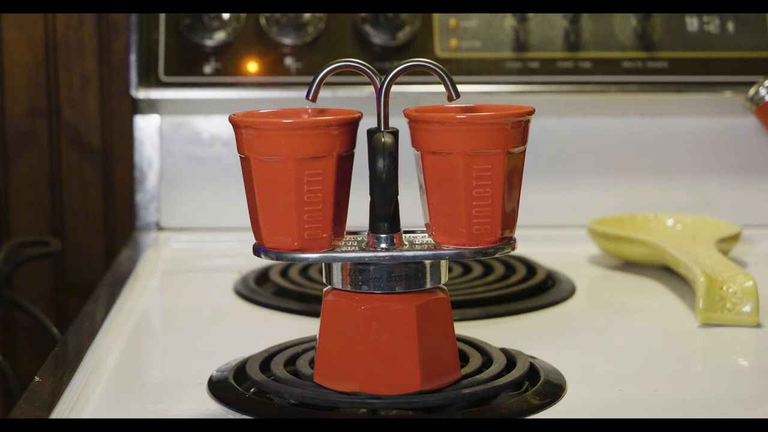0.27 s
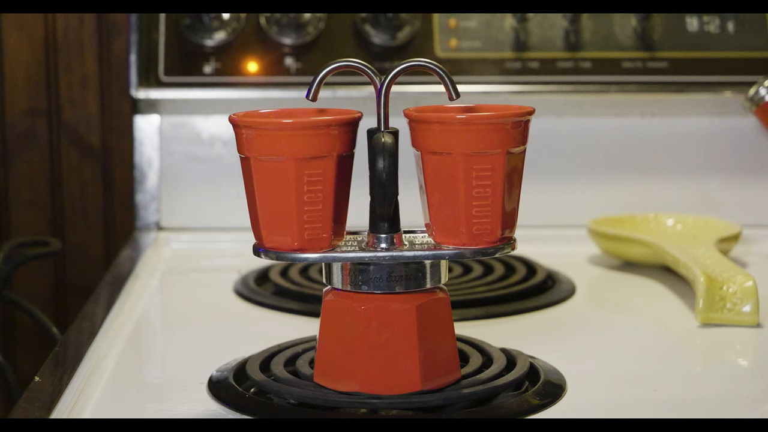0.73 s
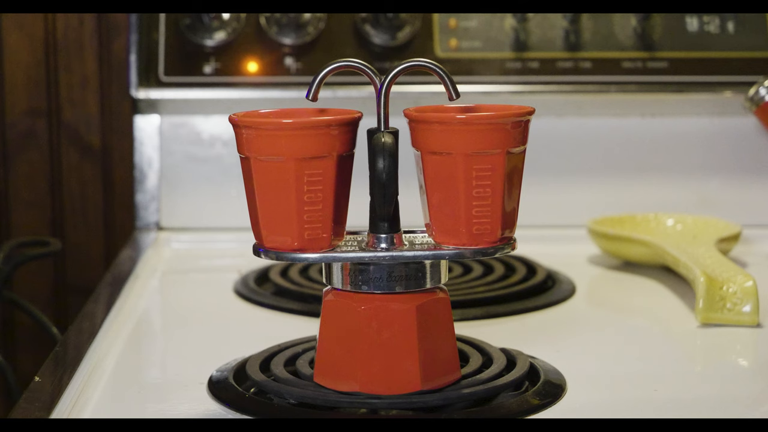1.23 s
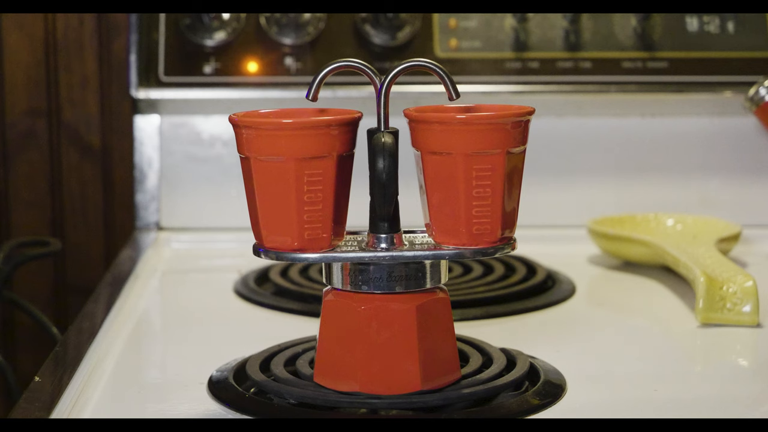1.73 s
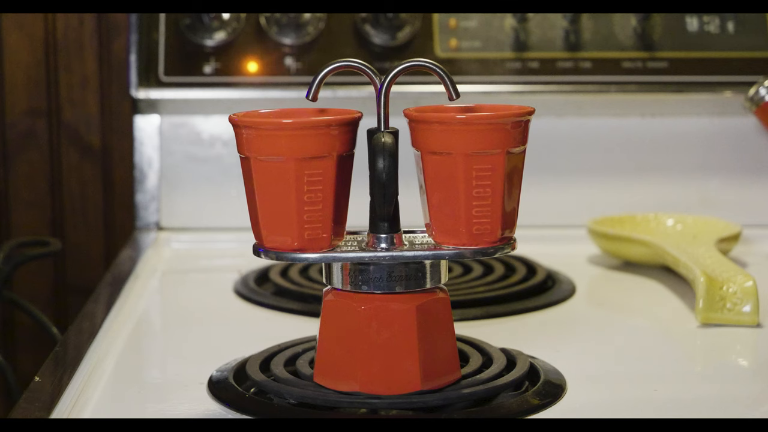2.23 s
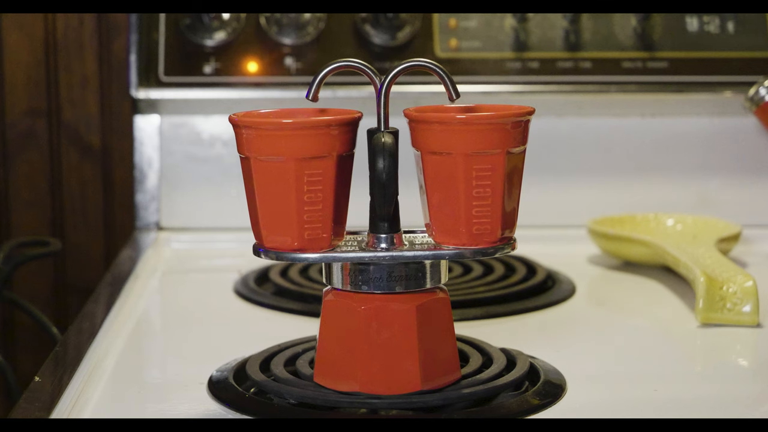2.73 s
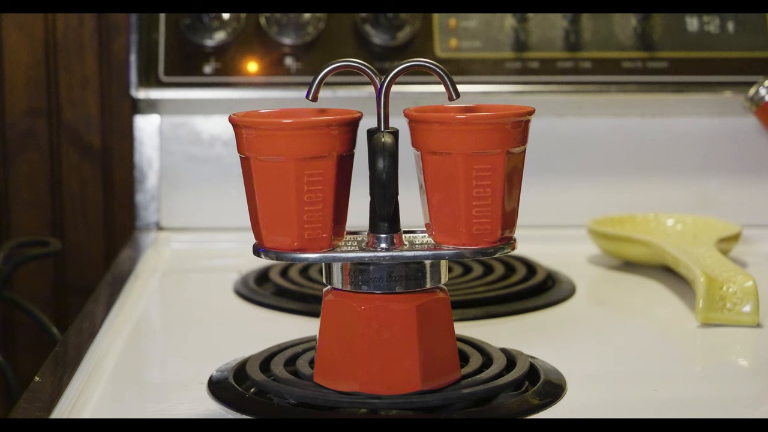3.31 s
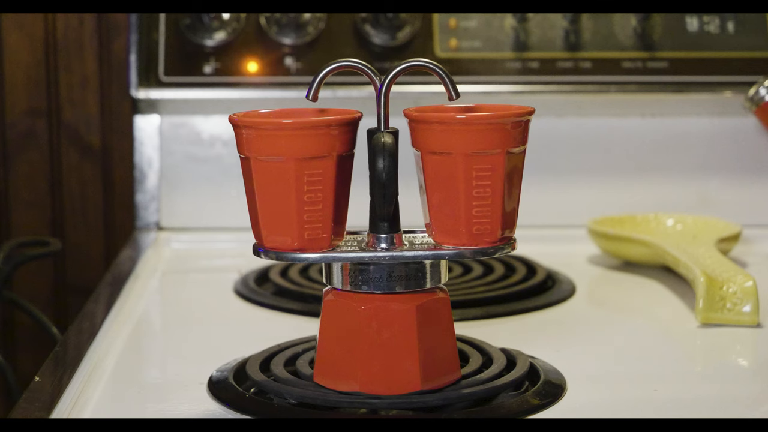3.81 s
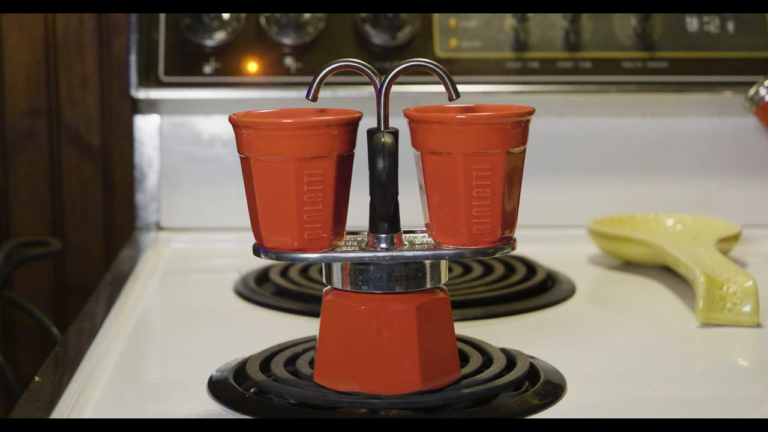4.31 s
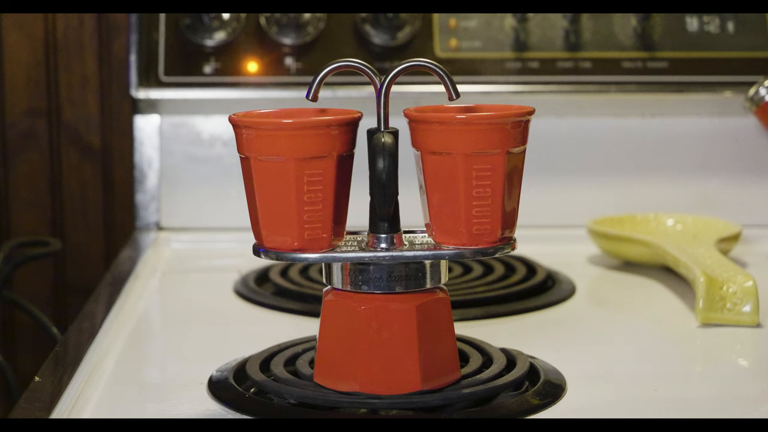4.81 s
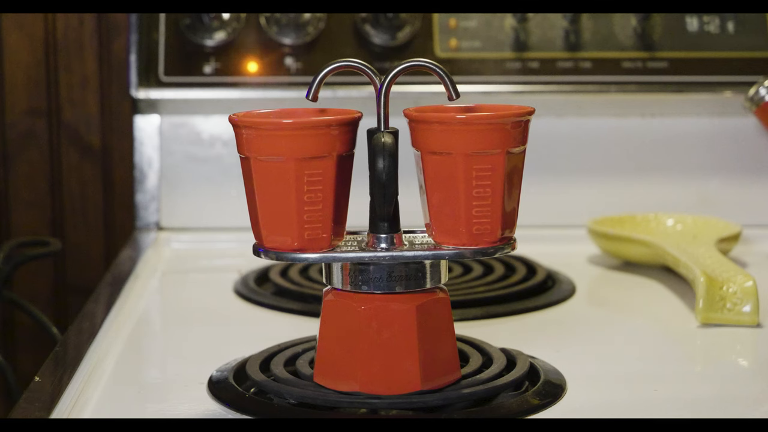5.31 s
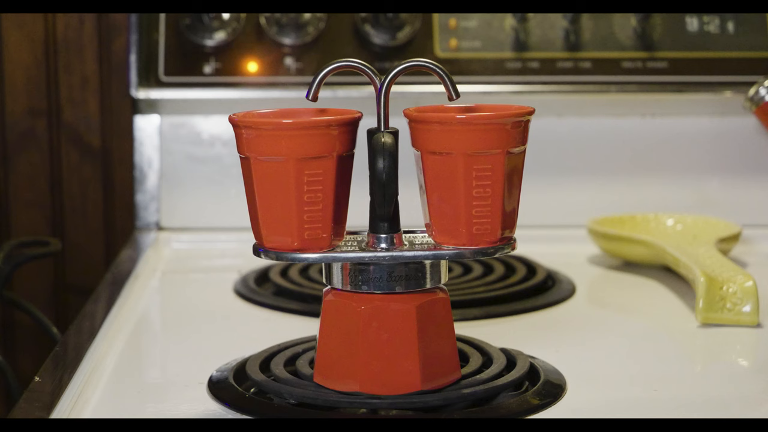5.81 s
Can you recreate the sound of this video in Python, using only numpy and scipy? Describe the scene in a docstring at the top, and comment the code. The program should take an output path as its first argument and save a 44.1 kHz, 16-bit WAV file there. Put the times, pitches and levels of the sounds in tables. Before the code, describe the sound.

Steam bubbles snap and tick inside a little coffee pot on an electric stove, surging twice, with soft boiler thuds and faint room hum.

```python
"""Steam bubbles burst in the narrow riser of a small coffee pot on an electric stove: each gives a few
cycles of ringing and a sharp tick. Loud bursts come singly and in dense surges over a crackle of small ones.
Single-cycle thuds gurgle low in the boiler and one jet of steam hisses from a spout.
The place is a quiet kitchen with filtered noise and a faint hum; the pot stands close to the microphone,
and short noise tails give the scatter from the surfaces nearby."""
import sys
import numpy as np
from scipy import signal
from scipy.fft import rfft, irfft
from scipy.io import wavfile
from scipy.ndimage import uniform_filter1d

SR = 44100
rng = np.random.default_rng(int(sys.argv[2]) if len(sys.argv) > 2 else 0)


def put_to_file(sound):
    """Save the sound as 16-bit audio at rate SR, in the file named by the first command-line argument."""
    columns = np.atleast_2d(sound).T  # one column per channel
    safe = np.clip(columns, -1, 1)
    whole_steps = np.round(safe * 32767)
    wavfile.write(sys.argv[1], SR, whole_steps.astype(np.int16))


N = 267246  # length in samples


def gain_of(db):
    """Amplitude factor of a level in dB."""
    return 10 ** (np.asarray(db) / 20)


def evened(x):
    """Scale to an RMS of 1."""
    return x / np.sqrt(np.mean(x ** 2) + 1e-20)


def read(points, hz):
    """Read a spectrum between its points, along a logarithmic frequency axis."""
    f, value = np.transpose(points)
    return np.interp(np.log(hz + 1), np.log(f + 1), value)


def add(mix, s, sound):
    """Lay a sound into the mix from time s, cut off at the end."""
    start = max(int(s * SR), 0)
    part = mix[start:start + len(sound)]
    part += sound[:len(part)]


def slow_wander(noise, size):
    """Noise smoothed twice over size samples, RMS 1."""
    return evened(uniform_filter1d(uniform_filter1d(noise, size), size))


def causal(points):
    """Impulse response of a spectrum with all its energy after the start; envelope peak 1."""
    hz = abs(np.fft.fftfreq(4096, 1 / SR))
    log_gain = np.log(gain_of(np.maximum(read(points, hz), -100)))
    minimum_phase = -signal.hilbert(log_gain).imag
    taps = np.fft.ifft(np.exp(log_gain + 1j * minimum_phase)).real[:1024]
    return taps / abs(signal.hilbert(taps)).max()


def bubble(hz, cycles, phase, overtone, size=300):
    """A bubble swings up over some cycles to a peak near 1 and dies away in the froth."""
    u = np.arange(size) / SR * hz
    turn = 2 * np.pi * (u + phase)
    shape = ((u / cycles) * np.exp(1 - u / cycles)) ** 2
    sharper = overtone * shape ** 2 * np.cos(2 * turn)  # compression is sharper than release
    return shape * np.cos(turn) + sharper


def tear(db, luck):
    """A film tears in a few uneven snaps, so that every tick has its own colour."""
    u = np.arange(len(luck)) / 7.02
    return gain_of(db) * luck * u * np.exp(1 - u) / 2


# Colour of the ticks and hiss as the microphone hears them: a dip near 4 kHz, a peak near 5 kHz.
# Each row: frequency in Hz, relative level in dB per Hz.
TICK_COLOUR = [(1500, -15.5), (2500, -5), (3890, -13), (4890, -3.5), (6650, -10), (10800, -22),
               (13000, -19), (16000, -39.5)]


def coloured(x):
    """Filter ticks or hiss to the colour in which the microphone hears them."""
    return signal.oaconvolve(x, causal(TICK_COLOUR))[:len(x)]


# The simmer between gushes, close by in the pot.
# Each row: time in seconds, steam pressure as a level in dB.
SIMMER = [(0, -33), (.35, -46), (.52, -34), (.62, -52), (.78, -36.5), (.85, -62.5), (1.2, -52), (1.45, -41),
          (1.8, -38), (2.0, -45.5), (2.12, -56), (2.39, -53.5), (2.55, -46), (3.15, -56), (3.7, -48),
          (3.95, -39), (4.12, -43), (4.3, -38), (4.7, -46.5), (5.15, -39), (5.34, -50.5), (5.42, -49),
          (6.06, -51.5)]


def simmer_db(t):
    """Steam pressure of the simmer, in dB, in straight lines between the points."""
    return np.interp(t, *np.transpose(SIMMER))


# Gushes, in which small bubbles crowd together.
# Each row: start in seconds, length in seconds, level in dB.
GUSHES = [(.003, 0.02, -25.5), (0.098, 0.022, -30.5), (0.227, 0.019, -37), (0.459, 0.012, -26.5),
          (1.403, 0.026, -25.5), (1.437, 0.017, -28), (1.52, 0.015, -27.5), (1.559, 0.033, -30),
          (1.61, 0.019, -26.5), (1.638, 0.048, -26), (1.711, 0.04, -20), (1.771, 0.077, -22.5),
          (1.846, 0.018, -27), (3.952, .018, -33), (3.98, .022, -33), (4.07, 0.017, -32.5),
          (4.148, 0.018, -26), (4.207, 0.022, -29.5), (4.235, 0.048, -21), (4.303, 0.025, -24.5),
          (4.345, 0.022, -38), (4.387, 0.058, -22), (4.456, 0.055, -26), (4.611, 0.043, -32.5),
          (5.027, 0.027, -34), (5.075, 0.0088, -25), (5.154, 0.0058, -24), (5.211, 0.034, -33)]
GUSH_EDGE_S = 0.0022  # rise before the start and fall after the end


def steam(t):
    """Level of the small bubbles in dB: the powers of the simmer and of each gush add up."""
    power = gain_of(simmer_db(t)) ** 2
    for s, length, db in GUSHES:
        inside_s = np.minimum(t - s, s + length - t)
        swell = np.clip(inside_s / GUSH_EDGE_S + 1, 0, 1)
        power = power + (gain_of(db) * swell) ** 2
    return 10 * np.log10(power)


# Colour of the kitchen air at the microphone.
# Each row: frequency in Hz, relative level in dB per Hz.
AIR_COLOUR = [(45, -14), (107, 23.5), (271, 14), (690, -10), (2040, -5.5), (3920, -6), (5050, 0),
              (15300, -12), (16500, -31)]
AIR_DB, WAVER_DB = -57.5, 3  # RMS of the noise; RMS of the waver of its treble
HUM_HZ, HUM_DB = 59.5, -72  # RMS level


def air():
    """Kitchen noise with a faint mains hum; its treble hiss wavers and swells with the steam."""
    t = np.arange(N) / SR
    hz = np.fft.rfftfreq(N, 1 / SR)
    white, slow = rng.standard_normal((2, N))
    colour = rfft(white) * gain_of(read(AIR_COLOUR, hz))
    treble = hz / (hz + 2000)  # share of the hiss, half at 2000 Hz
    waver_db = WAVER_DB * slow_wander(slow, 2000)
    swell_db = 0.19 * (simmer_db(t) + 57)
    body = irfft(colour * (1 - treble), N)
    hiss = gain_of(waver_db + swell_db) * irfft(colour * treble, N)
    hum = np.sqrt(2) * np.sin(2 * np.pi * HUM_HZ * t)
    return gain_of(AIR_DB) * evened(body + hiss) + gain_of(HUM_DB) * hum


def nearby(x, t60, db, delay):
    """Scatter from cups, stove top and walls: a noise tail that fades in over a delay (s), then decays."""
    t = np.arange(SR // 4) / SR
    fade_in = np.clip(t / delay, 0, 1) ** 2
    tail = rng.standard_normal(len(t)) * gain_of(-60 * t / t60) * fade_in
    return gain_of(db) * signal.oaconvolve(x, tail / np.linalg.norm(tail))[:N]


# The loudest thuds, low in the boiler.
# Each row: start in seconds, peak in dB, pitch in Hz.
GLUGS = [(0.185, -37, 302), (0.374, -39, 437), (0.554, -34, 519), (0.959, -36.5, 301), (1.261, -44.5, 233),
         (2.302, -32, 568), (2.362, -27, 620), (2.969, -35.5, 533), (3.025, -35.5, 412),
         (3.103, -38.5, 260), (3.323, -35.5, 430), (3.666, -32.5, 430), (3.902, -37, 242), (4.04, -33, 299),
         (4.15, -37, 296), (4.47, -26, 520), (4.623, -22, 398), (4.854, -32, 520), (5.214, -29.5, 519),
         (5.28, -33, 493), (5.991, -39, 557)]
GLUG_CYCLES = 1.07  # cycles up to the peak
GURGLE_DB, GURGLES_PER_S = -51.5, 100  # RMS of the small thuds; their mean rate
GURGLE_STEP = 100  # samples between chances of a small thud


def gurgle():
    """Large bubbles collapse in the boiler with single-cycle thuds; the small ones are harder in a surge."""
    draw = rng.random((N // GURGLE_STEP, 5))
    t = np.arange(len(draw)) * GURGLE_STEP / SR
    out = np.zeros(N)
    for now, steam_db, (chance, size, pitch, length, phase) in zip(t, steam(t), draw):
        if chance < GURGLES_PER_S * GURGLE_STEP / SR:
            db = 0.1 * steam_db - 1.97 * np.log(size + 0.0056)  # a few are much louder
            thud = bubble(240 * 2.3 ** pitch, .22 + .35 * length, phase, 0, size=1400)
            add(out, now, gain_of(db) * thud)
    out = gain_of(GURGLE_DB) * evened(out)
    for (s, db, hz), phase in zip(GLUGS, rng.random(len(GLUGS))):
        add(out, s, gain_of(db) * bubble(hz, GLUG_CYCLES, phase, 0.46, size=1400))
    return out


# One jet of steam from a spout.
# The single row: level in dB, resonance in Hz, decay by 60 dB in seconds.
SPIT = (-31, 2970, 0.13)
SPIT_S = 2.761  # start


def spit():
    """A fluttering hiss, part of it ringing in the spout."""
    db, hz, t60 = SPIT
    t = np.arange(SR // 8) / SR
    jet, flutter = rng.standard_normal((2, len(t)))
    ring = signal.lfilter(*signal.iirpeak(hz, 4.5, SR), jet)
    hiss = coloured(jet)
    flutter_db = 1.8 * evened(uniform_filter1d(flutter, 90))
    swell = np.clip(t / 0.0045, 0, 1) * gain_of(-60 * t / t60 + flutter_db)
    out = np.zeros(N)
    add(out, SPIT_S, gain_of(db) * swell * (evened(ring) + 0.48 * evened(hiss)))
    return out


RISER_HZ, CROWDED_DB = 2220, -34.5  # around this steam level the froth comes to ring at the riser's pitch


def crackle():
    """Small bubbles at random; more steam makes them denser and louder, and each loud burst sheds froth."""
    t = np.arange(N) / SR
    s, pop_db, pop_hz, _ = np.transpose(POPS)
    shed = np.zeros(N)
    shed[(s * SR).astype(int)] = gain_of(pop_db - 13.0) ** 2
    shed = signal.lfilter([1], [1, -np.exp(-1 / (0.0043 * SR))], shed)  # power of the froth dies away

    steam_db = steam(t)
    crowded = np.clip((steam_db - CROWDED_DB) / 8 + .5, 0, 1)
    clump_db = (5.5 - 2.3 * crowded) * slow_wander(rng.standard_normal(N), 300)
    level_db = 10 * np.log10(gain_of(steam_db + clump_db) ** 2 + shed)
    denser_db = .25 * (level_db + 47.0)  # a quarter of the level goes into the rate, the rest into the size

    chance, size, pitch, length, phase, sharpness, merging = rng.random((7, N))
    at = np.flatnonzero(chance < 330 * gain_of(2 * denser_db) / SR)  # 330 bubbles per s at -47 dB
    size_db = level_db - denser_db - 4.2 * np.log(size + 0.016)
    tick_db = size_db - 10 + 24 * (sharpness - .5)

    hz = np.interp(t, s, pop_hz) ** (1 - crowded) * RISER_HZ ** crowded
    hz = hz * np.exp((0.63 - 0.31 * crowded) * (pitch - .45))
    merged = merging < .3
    hz = np.where(merged, 960 * 1.55 ** pitch, hz)  # merged bubbles are larger and sound lower and softer
    ring_db = size_db - 1.86 * merged
    cycles = .55 + .5 * crowded * ~merged + .7 * length

    rings, ticks = np.zeros(N), np.zeros(N)
    snaps = rng.standard_normal((4096, 90))
    for i in at:
        add(ticks, i / SR, tear(tick_db[i], snaps[i % 4096]))
        ring = bubble(hz[i], cycles[i], phase[i], 0.27, size=500)
        add(rings, i / SR, gain_of(ring_db[i]) * ring)
    return rings + coloured(ticks)


# The loudest bursts in the riser, close to the microphone.
# Each row: time in seconds, level of the ring in dB, bubble pitch in Hz, level of the tick in dB.
POPS = [(0.0059, -20, 2310, -8), (0.016, -15, 2520, -2.5), (0.054, -16, 2360, -13),
        (0.0712, -15, 2300, -11), (0.0825, -18.5, 2300, -18), (0.0994, -13, 2380, -15),
        (0.2012, -13, 2360, -12), (0.2297, -19, 2070, -10), (0.2471, -12, 2350, -11),
        (0.2558, -12, 1920, -19), (0.3077, -17, 2070, -24), (0.3387, -24.5, 2420, -24),
        (0.3596, -21.5, 2420, -21), (0.3783, -22.5, 1910, -13), (0.431, -14, 1960, -12),
        (0.4599, -14.5, 1940, -20), (0.5087, -16, 2000, -7.5), (0.5212, -21, 2000, -14.5),
        (0.5585, -20, 1870, -21), (0.596, -26, 1800, -19.5), (0.6219, -23, 1900, -21),
        (0.6312, -19.5, 2400, -18), (0.7456, -16.5, 1940, -12.5), (0.7656, -14.5, 1870, -10),
        (0.817, -25.5, 1870, -22.5), (0.8771, -33, 1880, -27), (0.8995, -32.5, 1960, -20),
        (1.0383, -32.5, 1850, -32), (1.1012, -22, 1920, -15.5), (1.1703, -19, 2400, -27),
        (1.1785, -16, 1950, -6), (1.197, -21, 1940, -6.5), (1.3188, -17, 1940, -9.5),
        (1.3469, -32, 2040, -18), (1.3825, -21, 1860, -12.5), (1.4142, -33, 1970, -8),
        (1.4261, -31, 2070, -19), (1.446, -18, 2120, -21), (1.4566, -31, 2080, -16),
        (1.497, -18.5, 2290, -11), (1.513, -14.5, 2460, -8), (1.5293, -16, 2070, -6),
        (1.549, -12, 1910, -7), (1.5598, -23, 1500, -16), (1.5844, -15, 2000, -14),
        (1.6187, -14.5, 1340, -6.5), (1.6531, -13.5, 2400, -4), (1.6727, -14, 1470, -9),
        (1.7179, -9, 2330, -16), (1.7278, -13, 1940, -17), (1.743, -11, 2000, -10),
        (1.7581, -10, 2320, -33), (1.7788, -12.5, 2190, -25), (1.8074, -9, 1980, -14),
        (1.838, -22, 2200, -28), (1.8676, -14, 2190, -24), (1.9577, -21, 2240, -34),
        (1.9893, -17, 2030, -11.5), (2.0122, -15.5, 2120, -10), (2.0514, -21.5, 2260, -18),
        (2.0738, -19, 2250, -26), (2.195, -17.5, 990, -26), (2.2325, -16.5, 1040, -45),
        (2.3761, -16, 1100, -40), (2.3946, -18, 1040, -33), (2.413, -18, 2240, -12.5),
        (2.427, -24.5, 2340, -35), (2.482, -23, 1970, -15.5), (2.5065, -26, 2400, -16.5),
        (2.5513, -42, 1820, -24), (2.566, -26, 1820, -14), (2.6267, -19, 1860, -21),
        (2.6958, -18.5, 2060, -25), (2.7557, -25, 2360, -21.5), (2.825, -29.5, 1410, -17),
        (3.0291, -23, 1830, -23.5), (3.0551, -22, 1900, -14.5), (3.229, -32, 2570, -12),
        (3.241, -12.5, 2570, -5.5), (3.3616, -21, 1940, -13), (3.3777, -22, 2020, -14),
        (3.4513, -20, 2380, -12.5), (3.515, -30, 2480, -23), (3.5324, -23.5, 2490, -40),
        (3.5503, -12, 2320, -6.5), (3.596, -19.5, 2570, -29), (3.7719, -13.5, 2220, -8),
        (3.793, -21, 2430, -38), (3.8521, -34, 1210, -13), (3.8738, -35, 1280, -8),
        (3.8955, -39, 1850, -18.5), (3.9359, -30, 1940, -19), (3.9485, -18, 1670, -6.5),
        (3.9754, -20, 2340, -17), (3.9895, -18, 2020, -13.5), (4.0293, -20, 2520, -21),
        (4.0805, -13, 2160, -1), (4.0912, -15, 1980, -6.5), (4.1477, -17.5, 2250, -10),
        (4.1585, -10.5, 2250, -15), (4.19, -19, 2320, -14), (4.1995, -4.5, 2290, -8),
        (4.2461, -11.5, 1980, -13), (4.259, -5, 2160, -20), (4.2714, -9.5, 2450, -26),
        (4.2886, -10.5, 2270, -24), (4.3046, -10.5, 2460, -7.5), (4.331, -10.5, 2250, -26),
        (4.3535, -11, 2310, -15), (4.4051, -19, 2060, -4.5), (4.4176, -8, 2380, -26),
        (4.4305, -6.5, 2190, -25), (4.459, -19, 2030, -14), (4.4982, -17.5, 2450, -6),
        (4.5632, -36, 2020, -28), (4.5746, -21, 1990, -18), (4.5919, -15, 2070, -23),
        (4.6075, -22, 2070, -22), (4.6162, -20.5, 2080, -21), (4.6271, -26, 955, -28),
        (4.657, -25, 1870, -19), (4.7187, -25.5, 2480, -36), (4.7444, -20.5, 1300, -18.5),
        (4.7597, -19.5, 1970, -15.5), (4.8468, -27, 2060, -13), (4.8666, -24.5, 2020, -15),
        (4.9424, -12, 1900, -9.5), (4.9827, -19.5, 1880, -20.5), (5.0211, -20, 1910, -8),
        (5.0361, -14.5, 1940, -16), (5.052, -15, 1040, -27), (5.0799, -12, 1970, -18),
        (5.1163, -25, 1970, -18), (5.158, -11.5, 1970, -4), (5.1845, -24, 1300, -18), (5.2, -26, 1520, -15),
        (5.2186, -14, 1030, -35), (5.2548, -27, 1890, -16.5), (5.2692, -18.5, 1970, -13),
        (5.2851, -24, 2040, -12), (5.292, -28, 1200, -18), (5.3827, -24.5, 940, -24),
        (5.3935, -23, 1010, -16.5), (5.4086, -16.5, 1180, -31), (5.4259, -24, 1370, -21),
        (5.4953, -35, 1120, -15.5), (5.516, -32, 2000, -17.5), (5.5317, -26.5, 1920, -12),
        (5.5509, -18, 1950, -5.5), (5.622, -30, 1960, -20), (5.6643, -34, 1980, -17.5),
        (5.6827, -27.5, 1940, -12), (5.7038, -17.5, 1050, -21), (5.7157, -24, 1900, -17),
        (5.7398, -30, 1920, -24), (5.7955, -22.5, 2390, -24), (5.8197, -23, 1080, -48),
        (5.8687, -21.5, 970, -26.5), (5.9237, -23, 1930, -14.5), (5.9445, -37, 1830, -17.5),
        (6.0553, -22, 1030, -38)]


def pops():
    """The loud bursts: a ring, a tick and a low push into the water."""
    rings, ticks = np.zeros(N), np.zeros(N)
    luck, snaps = rng.random((len(POPS), 4)), rng.standard_normal((len(POPS), 90))
    for (s, db, hz, tick_db), (length, phase, push, push_pitch), snap in zip(POPS, luck, snaps):
        cycles = (0.79 + 0.61 * length) * (hz / RISER_HZ) ** .5  # large bubbles are damped in fewer cycles
        add(rings, s - cycles / hz, gain_of(db) * bubble(hz, cycles, phase, 0.14))  # peaks at s
        push_db = 0.52 * db - 24.0 - 43.0 * push
        low_push = bubble(260 + 270 * push_pitch, 1.0, push, 0, size=900)
        add(rings, s - .002, gain_of(push_db) * low_push)
        even_snap = snap / np.linalg.norm(snap[4:16]) * 2  # equal strength where the tear is loudest
        add(ticks, s - .0004, tear(tick_db, even_snap))
    return rings + coloured(ticks)


def scene():
    """The pot, its near scatter and a later, fainter one, and the kitchen air."""
    pot = pops() + crackle() + gurgle() + spit()
    near = nearby(pot, t60=0.021, db=-14.0, delay=0.00086)
    later = nearby(pot, t60=0.058, db=-19.0, delay=0.01)
    return (pot + near + later + air())[None]


LOW_CUT_HZ, EDGE_HZ = 62, 16000
OVERLOAD = .55  # amplitude ceiling


def record(dry):
    """The low cut of the microphone, a soft overload on the sharpest peaks, then the band limit."""
    thin = signal.sosfilt(signal.butter(4, LOW_CUT_HZ, "high", fs=SR, output="sos"), dry)
    soft = OVERLOAD * np.tanh(thin / OVERLOAD)
    band_limit = signal.firwin(511, EDGE_HZ, window=("kaiser", 9), fs=SR)
    return signal.oaconvolve(soft, band_limit[None], "same")


dry = scene()
out = record(dry)
put_to_file(out)
```